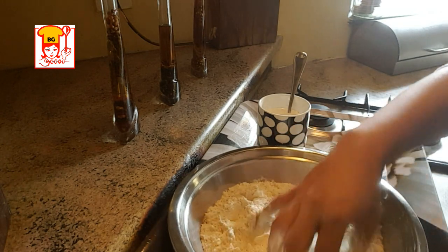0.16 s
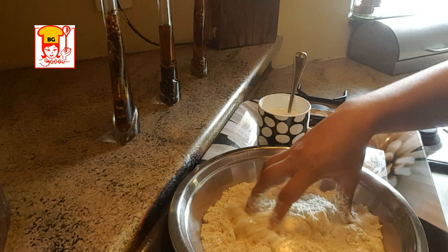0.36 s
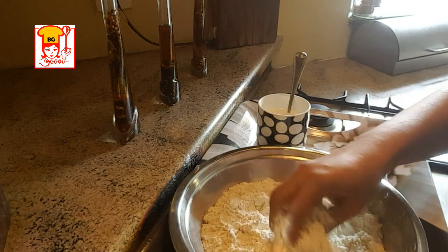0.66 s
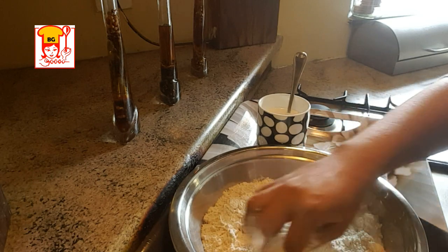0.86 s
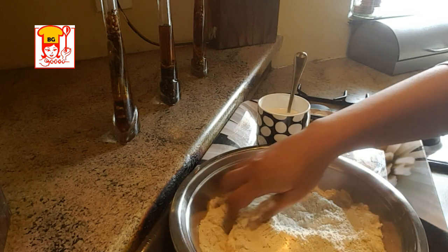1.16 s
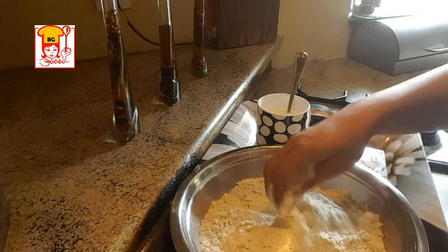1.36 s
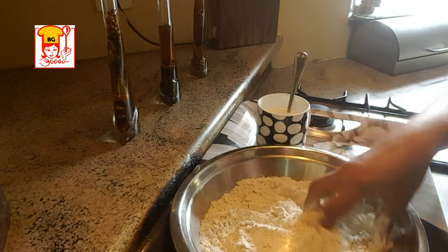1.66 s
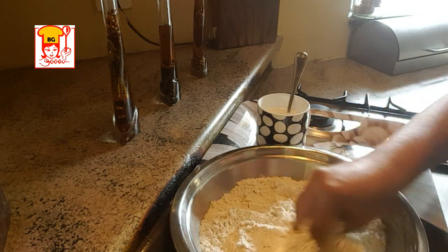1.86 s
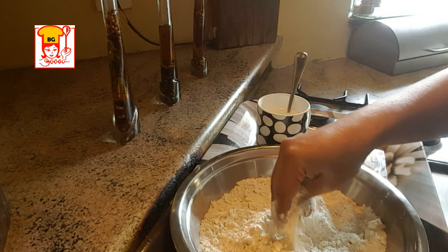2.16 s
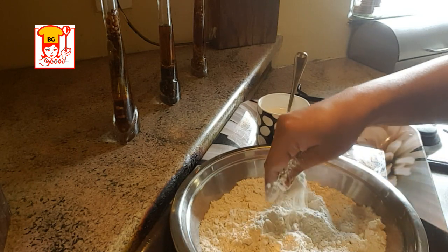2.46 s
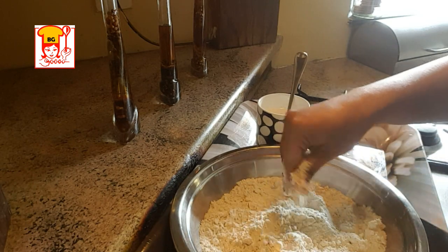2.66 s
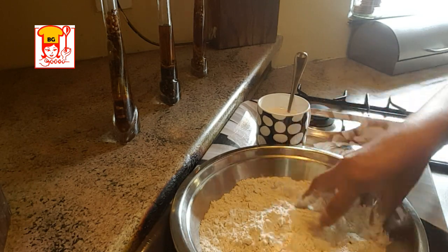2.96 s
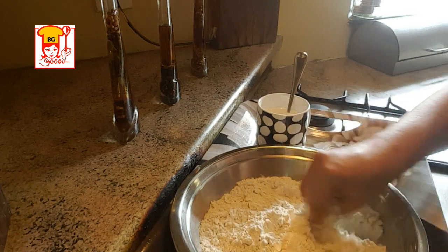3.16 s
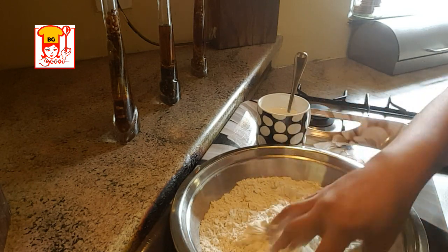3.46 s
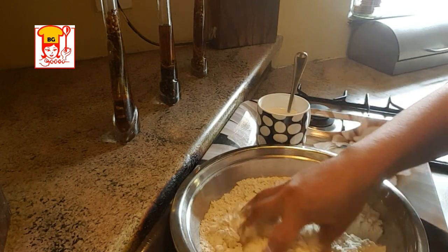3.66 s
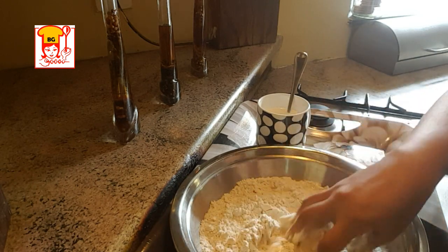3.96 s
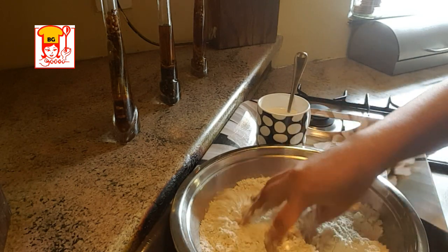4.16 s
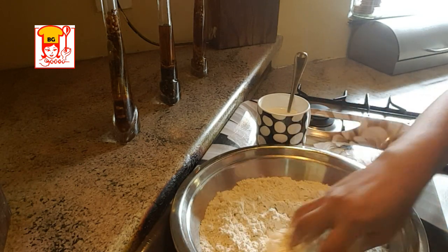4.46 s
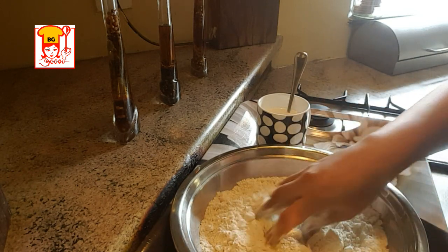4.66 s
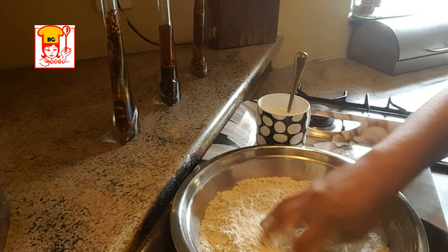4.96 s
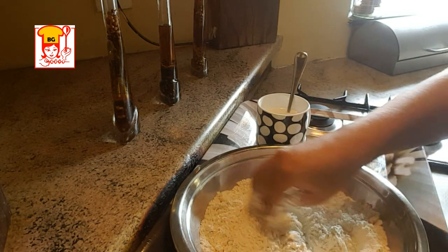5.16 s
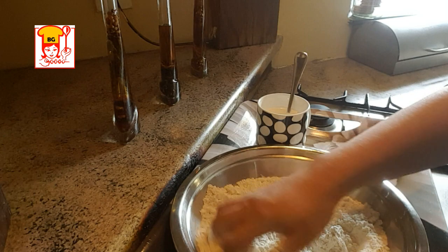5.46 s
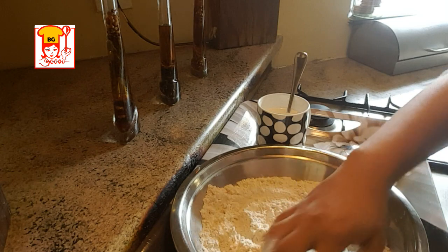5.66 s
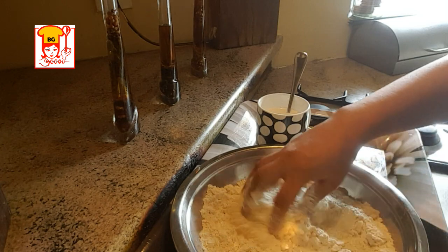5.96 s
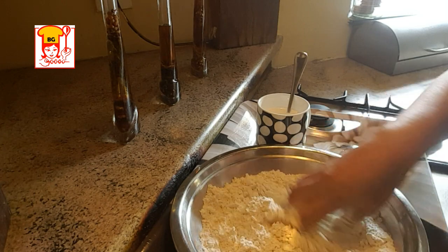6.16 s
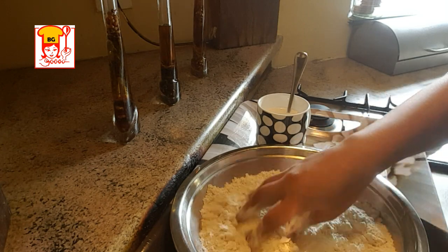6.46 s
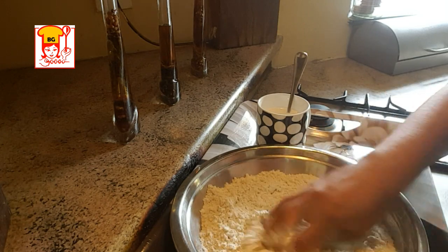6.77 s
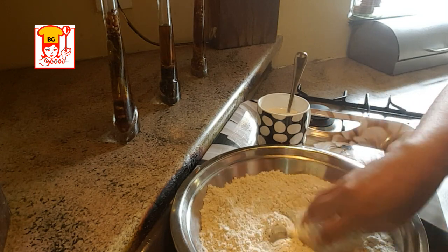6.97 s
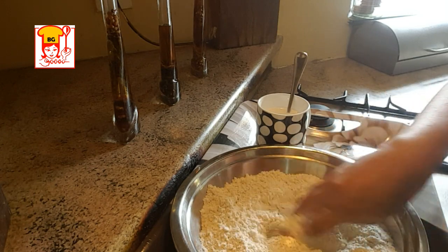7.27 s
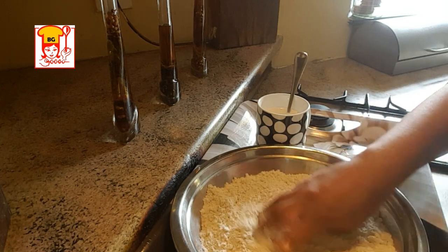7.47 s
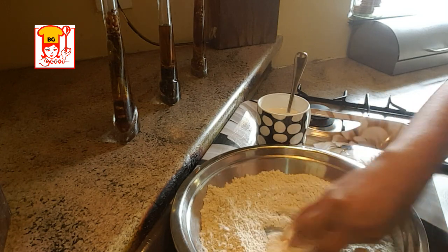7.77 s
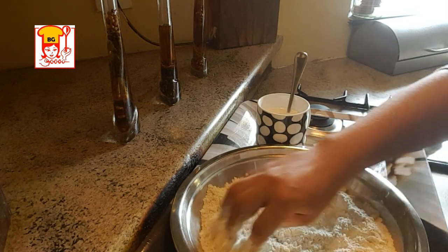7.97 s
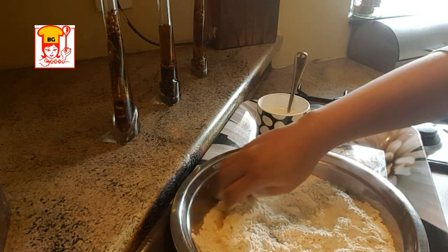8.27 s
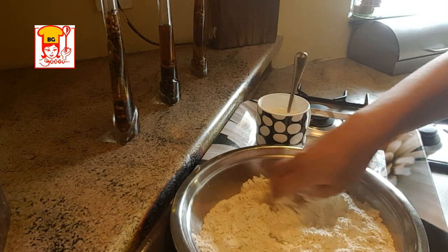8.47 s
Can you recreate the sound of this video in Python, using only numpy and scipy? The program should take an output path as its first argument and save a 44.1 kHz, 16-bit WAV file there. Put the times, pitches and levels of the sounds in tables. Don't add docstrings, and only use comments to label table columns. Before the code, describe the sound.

A hand works dry flour and fat in a steel bowl on a kitchen counter, heard close. Short scratchy strokes hiss and crunch, with a hard bright knock and nail scrapes in the first second and a half. A long quieter stretch follows with faint sifting, then busier steady rubbing, metallic scrapes and low counter bumps to the end. Faint appliance hum sits behind, slightly stronger rasp on the right.

```python
import sys
import numpy as np
from scipy import signal
from scipy.fft import rfft, irfft, next_fast_len
from scipy.io import wavfile
from scipy.ndimage import uniform_filter1d

SR = 44100
rng = np.random.default_rng(int(sys.argv[2]) if len(sys.argv) > 2 else 0)


def to_wav(s):
    ch = np.atleast_2d(s).T
    pcm = np.round(np.clip(ch, -1, 1) * 32767)
    wavfile.write(sys.argv[1], SR, pcm.astype(np.int16))


def volts_from_db(level):
    exponent = np.asarray(level, float) / 20
    return 10 ** exponent


N = 379701


def shape(x, points, to_gain):
    size = next_fast_len(N)
    hz, value = np.transpose(points)
    log_hz = np.log(np.arange(size // 2 + 1) * SR / size + 1)
    gain = to_gain(np.interp(log_hz, np.log(hz), value))
    return irfft(rfft(x, size) * gain, size)[..., :N]


def unit(x):
    return x / np.sqrt(np.mean(x ** 2))


def band(x, low_hz, high_hz):
    return signal.sosfilt(signal.butter(2, [low_hz, high_hz], "band", fs=SR, output="sos"), x)


def walk(rate):
    hold = int(SR / rate)
    steps = np.repeat(rng.standard_normal(N // hold + 1), hold)
    return 1.3 * uniform_filter1d(uniform_filter1d(steps, hold), hold)[:N]


def slips(rate, fade_s):
    kicks = (rng.random(N) < rate / SR) * rng.random(N)
    trail = signal.lfilter([1], [1, -np.exp(-1 / (fade_s * SR))], kicks)
    return unit(trail - trail.mean())


def grains(rate, spread_db):
    when, size, sign = rng.random(N), rng.exponential(size=N), rng.standard_normal(N)
    return unit((when < rate / SR) * sign * volts_from_db(spread_db * np.minimum(size, 4.5)))


# pitch_hz, likeness (0-1)
PORT_LIKENESS = [(60, 1), (250, 0.62), (1000, 0.16), (4000, 0), (12000, 0)]


def wide(mid, side):
    mid = shape(mid, PORT_LIKENESS, lambda c: np.sqrt(1 + np.clip(c, 0, 1)))
    side = shape(side, PORT_LIKENESS, lambda c: np.sqrt(1 - np.clip(c, 0, 1)))
    return np.array([mid + side, mid - side]) / np.sqrt(2)


def rasp(colour, rate, spread_db):
    return unit(shape(wide(grains(rate, spread_db), grains(rate, spread_db)), colour, volts_from_db))


def ring(force, modes, wander_db, spread):
    out, total = np.zeros((2, N)), 0
    for hz, width, db in modes:
        radius = np.exp(-np.pi * width / SR)
        pole = radius * np.exp(2j * np.pi * hz / SR)
        mode = signal.lfilter([1], [1, -pole], force * volts_from_db(wander_db * walk(14)))
        lean = np.clip(spread * min(hz / 900, 1) * rng.uniform(-1.61, 1), -.95, .95)
        turn = np.exp(1j * lean * np.array([[1], [-1]]))
        even_power = np.sqrt(2 * width * (1 - radius ** 2))
        out += volts_from_db(db) * even_power * (mode * turn).imag
        total += volts_from_db(2 * db) * width
    return out / np.sqrt(total)


SETTLE_DB, SETTLE_T60_S = -18.5, 0.47


def gesture(rows, attack_s, t60_s, rest_db):
    power = np.full(N, volts_from_db(2 * rest_db))
    for (start, length, db, swell_db), attack in zip(rows, attack_s):
        t = np.arange(int(start * SR), min(int((start + length + 1) * SR), N)) / SR - start
        hold_db = db + swell_db * np.clip(t / length, 0, 1) - max(swell_db, 0)
        after_db = -60 * np.maximum(t - length, 0)
        fall = volts_from_db(after_db / t60_s) + volts_from_db(SETTLE_DB + after_db / SETTLE_T60_S)
        level = volts_from_db(hold_db) * fall * np.minimum(t / attack, 1)
        power[int(start * SR):][:len(t)] += level ** 2
    return 10 * np.log10(power)


# pitch_hz, level_db (per Hz)
RUMBLE_COLOUR = [(15, -35.5), (25, -11), (54, 0.5), (70, -14), (102, -1.5), (124, -21.5), (157, -2.5),
                 (193, -28.5), (227, -7), (340, -21.5), (440, -52), (750, -120)]
# pitch_hz, level_db (per Hz)
AIR_COLOUR = [(200, -35), (340, -7.5), (426, -9.5), (702, -6.5), (969, -14), (1820, -19), (2130, -15.5),
              (5350, -26), (16000, -26)]
RUMBLE_DB, AIR_DB = -64, -70


def kitchen():
    rumble, air = (wide(rng.standard_normal(N), rng.standard_normal(N)) for _ in range(2))
    rumble = unit(shape(rumble, RUMBLE_COLOUR, volts_from_db)) * volts_from_db(RUMBLE_DB + 2.0 * walk(4.14))
    return rumble + unit(shape(air, AIR_COLOUR, volts_from_db)) * volts_from_db(AIR_DB + 0.9 * walk(3.2))


# start_s, length_s, hiss_db, steel_pressure_db, swell_db
FINGER_STIRS = [(0.0, 0.13, -56.5, 9.5, 12), (0.132, 0.077, -59, 4, -4.5), (0.58, 0.15, -80, 25, -10.5),
                (1.13, 0.041, -52, -1, -2), (1.17, .035, -60, 4, 3), (1.61, .05, -64, -3, 5),
                (1.831, 0.07, -68.5, 3.5, 6), (2.235, 0.033, -73.5, -11, 0), (2.608, 0.15, -74, -13, 0),
                (3.363, 0.055, -73.5, -7, 2), (3.58, 0.12, -76.5, -12, -1), (3.673, 0.2, -67, 5, 1),
                (4.066, .055, -72, 5, 1), (4.145, 0.027, -66.5, -6, -2.5), (4.242, 0.091, -59.5, 1.5, 18),
                (4.366, 0.032, -61.5, 1.5, 0.5), (4.589, 0.041, -65, 2, -0.5), (4.638, 0.12, -76, 8.5, 0.5),
                (4.726, 0.081, -61, -1.5, 3), (4.847, 0.072, -61.5, 4.5, 2), (5.416, .2, -69, 3.5, 4),
                (5.622, 0.077, -61.5, 3.5, 3), (0.512, 0.029, -50.5, 6, 0), (0.853, 0.026, -67.5, 21, 2),
                (4.462, .035, -60, 10, 4)]
# start_s, length_s, hiss_db, steel_pressure_db, swell_db
NAIL_SCRAPES = [(0.446, 0.017, -52, 21, -9), (0.484, 0.064, -76.5, 33, -11), (0.096, 0.027, -55, 11, -2.5),
                (0.741, 0.027, -82, 28, -7), (0.788, .035, -78.5, 29, -9.5), (5.324, .01, -70, 8, -7),
                (1.083, .04, -65.5, 8, 6), (1.125, 0.026, -64, 9.5, -8), (1.202, 0.105, -49.5, 11, -2),
                (3.009, 0.065, -68, -3, -4), (3.085, 0.064, -59.5, 10, 0), (6.345, 0.022, -66, 23.5, -3),
                (5.01, 0.073, -71.5, 10, -1), (5.079, 0.029, -61, 12, -7), (5.71, 0.094, -60, 5, -2.5),
                (6.168, 0.027, -48, 4, 4), (6.194, 0.077, -49.5, 8, -5), (6.288, .1, -65.5, 16, -2.5),
                (6.808, 0.05, -70.5, 13.5, -1.5), (6.856, 0.12, -56.5, 2, 1), (7.74, 0.048, -57, -2, -0.5),
                (1.655, .02, -62, 4, -3), (0.698, .012, -78, 18, -5), (0.646, .015, -76, 18, -5),
                (4.898, .02, -66, 8, -4), (4.86, .02, -69, 5, -3), (8.152, 0.046, -61, 5, -7),
                (8.376, 0.19, -48.5, 9, -5)]
# start_s, length_s, hiss_db, steel_pressure_db, swell_db
HAND_RUBS = [(6.435, 0.21, -57, 5, 4), (6.653, 0.15, -63.5, -3.5, 0.5), (7.036, 0.086, -54.5, -2, -3.5),
             (7.175, 0.15, -53, -1.5, 3), (7.376, 0.086, -55, 0.5, -5), (7.481, 0.18, -52.5, -3, 0),
             (7.678, 0.056, -57.5, -17, -3), (7.845, 0.086, -54, 2.5, -1), (7.8, 0.043, -55.5, 2, -3),
             (6.13, .045, -70, 3, 8), (1.33, .06, -75, 15, -6), (1.645, .095, -59, 5, 1),
             (8.191, .18, -54.5, -2, 9), (8.2, .17, -76, 21, 2), (5.085, 0.14, -58.5, 4.5, -5),
             (7.94, 0.048, -66, -5, -8), (6.97, 0.058, -58, -14, -2), (5.77, .125, -54, 7, 1),
             (1.59, .04, -68, -5, 0)]
# hiss_db, crunch_db, drag_db, sway_db, slab_db, foot_db
STILL_DB = (-95, -86.5, -77.5, -74, -66.5, -73)
SCRAPE_ATTACK_S, STIR_ATTACK_S, RUB_ATTACK_S = 0.0041, 0.027, 0.035
FLOUR_T60_S, STEEL_T60_S = 0.11, 0.092
CRUNCH_DB, CRUNCH_PER_PRESSURE = -2.5, 0.43


def hand():
    strokes = [*NAIL_SCRAPES, *FINGER_STIRS, *HAND_RUBS]
    start, length, hiss_db, pressure_db, swell_db = np.transpose(strokes)
    counts = [len(NAIL_SCRAPES), len(FINGER_STIRS), len(HAND_RUBS)]
    attack_s = np.repeat([SCRAPE_ATTACK_S, STIR_ATTACK_S, RUB_ATTACK_S], counts)

    def layer(gain_db, t60_s, rest_db):
        rows = np.transpose([start, length, hiss_db + gain_db, swell_db])
        return gesture(rows, attack_s, t60_s, rest_db)

    hiss = layer(0, FLOUR_T60_S, STILL_DB[0])
    crunch = layer(CRUNCH_DB + CRUNCH_PER_PRESSURE * pressure_db, FLOUR_T60_S, STILL_DB[1])
    return hiss, crunch, layer(pressure_db, STEEL_T60_S, STILL_DB[2])


# pitch_hz, level_db (per Hz)
DUST_COLOUR = [(2500, -16), (5000, -3), (6200, -2), (9000, -1), (13100, -3), (14000, -9), (16000, -15)]
# pitch_hz, level_db (per Hz)
CRUMB_COLOUR = [(1200, -9.5), (2200, -0.5), (3000, 0), (5200, -1), (6200, -30), (12000, -43)]
# pitch_hz, width_hz, level_db
RIM_MODES = [(2350, 100, -3), (2632, 33, 1), (3030, 68, -2.5), (3435, 60, 1), (3850, 120, 0.5),
             (4260, 195, -1.5), (4650, 150, 3), (5026, 37, -2.5), (5360, 110, -10.5), (5970, 170, -10.5)]


def flour(hiss_db, crunch_db):
    grip_db = 1.48 * slips(40, 0.015)
    hiss = rasp(DUST_COLOUR, 15000, .8) * volts_from_db(hiss_db + 0.42 + 0.96 * grip_db + 1.7 * walk(60))
    crunch = volts_from_db(crunch_db + grip_db + 2.26 * slips(60, 0.01))
    wall = ring(grains(6000, 1.9) * crunch, RIM_MODES, wander_db=2.5, spread=1.0)
    return hiss + volts_from_db(-2.5) * rasp(CRUMB_COLOUR, 6000, 2.1) * crunch + volts_from_db(-1.5) * wall


def glints(hiss_db):
    modes = [(hz, 0.031 * hz, 0) for hz in np.geomspace(5800, 12500, num=12)]
    return ring(grains(9000, 1.4) * volts_from_db(hiss_db - 8.0), modes, wander_db=5.0, spread=1.06)


# start_s, length_s, sway_db, slab_db, foot_db
BOWL_ROCKS = [(0.08, 0.21, -57.5, -62, -58.5), (0.445, 0.07, -47, -43, -42), (0.6, 0.085, -63, -56, -55),
              (0.74, 0.17, -63, -55, -58), (1.1, 0.11, -68, -50.5, -49), (1.2, 0.15, -61, -54.5, -53.5),
              (1.68, .08, -61, -56, -63), (3.015, 0.035, -66, -54, -68), (3.09, 0.071, -55, -55, -57.5),
              (4.17, 0.26, -65, -62, -69), (4.465, 0.042, -66, -56, -50.5), (4.74, 0.16, -62, -77, -75),
              (5.0, 0.13, -47.5, -52.5, -55.5), (5.75, .16, -60, -71, -53.5), (6.17, 0.18, -57, -58.5, -48),
              (6.8, 0.068, -43, -48, -52), (7.16, 0.08, -42.5, -51, -62), (7.5, .12, -58, -63, -66),
              (7.86, 0.13, -48, -53.5, -63), (8.157, 0.03, -55, -49, -46.5), (8.27, .08, -60, -47.5, -51.5),
              (8.38, 0.14, -55, -48.5, -47.5), (5.35, 0.44, -64, -76, -72), (6.45, .3, -61, -66, -78)]
ROCK_ATTACK_S, ROCK_T60_S, ROCK_SAG_DB = 0.016, 0.31, -4


def rocking():
    start, length, *loads_db = np.transpose(BOWL_ROCKS)
    sag_db = np.full(len(start), ROCK_SAG_DB)
    attack_s = [ROCK_ATTACK_S] * len(start)
    return [gesture(np.transpose([start, length, db, sag_db]), attack_s, ROCK_T60_S, rest_db)
            for db, rest_db in zip(loads_db, STILL_DB[3:])]


def wobble(hz, drift):
    return np.sqrt(2) * np.sin(2 * np.pi * np.cumsum(hz * (1 + drift * walk(6.5))) / SR)


# pitch_hz, width_hz, level_db
SLAB_MODES = [(85, 9, -6), (116.4, 21, 0), (157.6, 20, -5)]
# pitch_hz, width_hz, level_db
FOOT_MODES = [(257.5, 28, 7.5), (295.8, 25, 5.5), (298, 24, -7)]
SWAY_HZ, SLAB_HZ = 47.6, 99.6


def counter():
    sway_db, slab_db, foot_db = rocking()
    sway = wobble(SWAY_HZ, 0.0389) * volts_from_db(sway_db + 0.7 + 1.4 * walk(8.6))
    slab_ring = ring(grains(2000, .5), SLAB_MODES, wander_db=1.0, spread=1.2)
    slab = volts_from_db(-2.5) * wobble(SLAB_HZ, 0.039) + volts_from_db(-3.5) * slab_ring
    foot = band(ring(grains(2000, 2.1), FOOT_MODES, wander_db=2.5, spread=1.0), 215, 345)
    return sway + slab * volts_from_db(slab_db - 1.1) + foot * volts_from_db(foot_db - 2.0)


# pitch_hz, width_hz, level_db
BOWL_MODES = [(492.4, 11.7, -5), (608, 26, -6.5), (658, 58, -10), (696.5, 19, 2.5), (785, 36, -1),
              (876, 33, -4), (988, 39, -3), (1115, 74, -6), (1287, 33, 0), (1430, 95, -3.5),
              (1442, 46, -9.5), (1772, 55, -4), (2077, 26, -22)]
# pitch_hz, level_db (per Hz)
SKIN_COLOUR = [(200, -32), (350, -11.5), (650, -1), (1000, -9.5), (1450, -1.5), (2200, -10), (3500, -15),
               (8000, -77)]


def drag(drag_db):
    push = volts_from_db(drag_db + 1.8 * slips(60, 0.013))
    wall = ring(grains(5000, 1.7) * push, BOWL_MODES, wander_db=1.5, spread=1.35)
    return volts_from_db(-2.5) * wall + volts_from_db(-4.0) * rasp(SKIN_COLOUR, 4000, 1.2) * push


# start_s, length_s, pitch_hz, peak_db
SKIN_CATCHES = [(.097, .016, 1421, -46), (.109, .008, 1421, -46), (.121, .02, 1421, -45),
                (.19, .006, 390, -46), (.458, .024, 1291, -37), (.504, .02, 1636, -48),
                (.524, .024, 1291, -45), (.594, .02, 1680, -50), (.585, .085, 700, -53),
                (.7, .015, 1650, -58), (.747, .014, 1300, -53), (.795, .012, 1800, -54),
                (.868, .018, 689, -41), (.873, .013, 473, -40), (.868, .018, 1808, -49),
                (1.206, .012, 1335, -38), (1.21, .009, 602, -36), (1.225, .01, 645, -36),
                (1.231, .028, 1335, -35), (1.248, .006, 818, -39), (1.26, .026, 1480, -40),
                (1.271, .006, 645, -41), (1.295, .014, 1507, -42), (1.3, .015, 904, -38),
                (1.698, .009, 602, -51), (4.495, .008, 600, -48), (4.9, .015, 690, -55),
                (4.9, .015, 1500, -56), (5.828, .012, 400, -48), (5.849, .008, 602, -46),
                (5.888, .018, 602, -45), (5.885, .02, 1851, -49), (6.24, .013, 689, -38),
                (6.243, .006, 1335, -43), (6.345, .02, 645, -46), (6.345, .02, 1650, -49),
                (6.393, .008, 689, -49), (6.63, .012, 608, -50), (6.9, .04, 1300, -56),
                (6.955, .01, 1450, -53), (7.62, .03, 1800, -57), (7.745, .03, 1780, -59),
                (8.261, .012, 689, -51), (8.317, .008, 689, -49), (8.33, .012, 689, -50),
                (8.372, .01, 600, -45), (8.436, .014, 645, -40), (8.512, .03, 645, -45),
                (8.558, .024, 645, -45), (8.562, .014, 1894, -46)]
# start_s, length_s, pitch_hz, peak_db
RIM_FLECKS = [(.107, .01, 2713, -46), (.446, .006, 2067, -40), (.447, .011, 4608, -48),
              (.447, .008, 4220, -48), (.456, .011, 2713, -41), (.454, .012, 3488, -42),
              (.524, .022, 2411, -50), (.65, .015, 2200, -58), (.742, .012, 2300, -58),
              (.868, .018, 2630, -55), (.872, .016, 3300, -57), (1.155, .01, 4650, -54),
              (1.18, .007, 2799, -48), (1.203, .006, 4651, -48), (1.203, .008, 3617, -51),
              (1.219, .008, 3273, -45), (1.221, .012, 4694, -50), (1.261, .011, 3273, -49),
              (1.264, .018, 4651, -49), (1.28, .006, 2325, -45), (1.3, .01, 2325, -45),
              (3.118, .03, 3400, -58), (5.085, .01, 2400, -55), (5.085, .01, 3000, -56),
              (5.801, .008, 4521, -51), (6.181, .04, 3850, -50), (6.184, .024, 4952, -51),
              (6.198, .011, 4694, -48), (6.201, .024, 3445, -47), (6.262, .012, 2627, -51),
              (6.856, .008, 2270, -54), (7.066, .01, 5890, -52), (7.315, .008, 2600, -54),
              (7.53, .012, 4800, -55), (7.61, .012, 4700, -55), (7.872, .008, 5400, -55),
              (8.213, .01, 4650, -51), (8.226, .012, 4700, -51), (8.226, .012, 5500, -54),
              (8.388, .015, 3746, -47), (8.396, .011, 4651, -47), (8.407, .018, 3014, -44),
              (8.467, .01, 4651, -47), (8.493, .012, 4521, -51), (8.5, .015, 4220, -51),
              (8.536, .011, 2627, -50), (8.554, .008, 2627, -49)]
CATCH_RISE, CATCH_FADE = .2, .3
CATCH_CHATTER, CATCH_LEAD_S = .5, .002


def catches():
    rows, t = [*SKIN_CATCHES, *RIM_FLECKS], np.arange(SR // 8) / SR
    out, steps = np.zeros((2, N + len(t))), rng.uniform(-1, 1, (len(rows), 2))
    chatter = uniform_filter1d(rng.standard_normal((len(rows), 2, len(t))), size=100) * 10
    for (s, length, hz, db), (turn, lag), (push, drift) in zip(rows, steps, chatter):
        rise = np.minimum(t / (CATCH_RISE * length), 1)
        swell = rise * np.exp(-np.maximum(t - .7 * length, 0) / (CATCH_FADE * length))
        port_lag = .9 * lag * np.array([[1], [-1]])
        phase = 2 * np.pi * hz * t + np.pi * turn + CATCH_CHATTER * drift + port_lag
        flutter = 1 + .5 * CATCH_CHATTER * push
        at = int((s - CATCH_LEAD_S) * SR)
        out[:, at:at + len(t)] += volts_from_db(db + .3) * swell * flutter * np.sin(phase)
    return out[:, :N]


# start_s, peak_db, pitch_hz, treble_db
BOWL_KNOCKS = [(0.183, -43, 500, -20), (0.445, -17.5, 1600, -11), (0.456, -26, 1700, -6),
               (0.482, -19, 705, -30), (0.584, -44, 1673, -19), (0.649, -48, 1600, -14),
               (0.74, -44, 510, -19), (0.793, -42, 684, -27), (0.872, -35.5, 600, -24),
               (1.09, -46, 690, -8), (1.13, -26, 603, -18), (1.147, -28.5, 616, -15),
               (1.21, -33, 1300, -14), (3.021, -49, 1390, -10), (3.088, -53, 470, -12),
               (4.168, -54, 637, -22), (4.483, -35, 590, -17), (5.016, -40, 477, -32),
               (5.084, -37.5, 993, -18), (5.713, -45.5, 710, -14), (6.175, -44, 2670, -11),
               (6.291, -32.5, 545, -24), (6.452, -46, 660, -11), (6.815, -36.5, 615, -17),
               (7.746, -53, 1330, -4), (7.813, -51, 700, -8), (8.157, -26.5, 650, -14),
               (8.165, -31, 480, -19), (8.384, -27, 647, -23), (8.403, -27, 564, -20)]
KNOCK_T60_S = 0.023


def knocks():
    t = np.arange(SR // 8) / SR
    note, tick, spit = np.zeros((2, N + len(t))), np.zeros(N + len(t)), np.zeros((2, N + len(t)))
    rattle = rng.standard_normal((len(BOWL_KNOCKS), 2, len(t)))
    fade = np.exp(-np.log(1000) * t / KNOCK_T60_S) * np.minimum(t / 0.0014, 1)
    for (s, db, hz, treble_db), noise in zip(BOWL_KNOCKS, rattle):
        at = slice(int(s * SR), int(s * SR) + len(t))
        lag = np.array([[.6], [-.6]]) * min(hz / 700, 1)
        note[:, at] += volts_from_db(db + 0.5) * fade * np.sin(2 * np.pi * hz * t + lag)
        tick[at] += volts_from_db(db - 13.0) * noise[0] * np.exp(-t / 0.0048)
        spit[:, at] += volts_from_db(db + treble_db - 4.0) * noise * np.exp(-t / 0.006)
    spit = band(spit, 1500, 5500)
    return ring(tick[:N], BOWL_MODES, wander_db=4.0, spread=1.6) + (note + spit)[:, :N]


# start_s, length_s, pitch_hz, level_db
FINGERTIP_SINGS = [(0.856, 0.045, 600, -42), (5.79, 0.09, 4600, -58), (7.55, .075, 1300, -58),
                   (8.156, .025, 1700, -44), (6.375, .025, 1400, -46), (1.2, 0.088, 865, -54),
                   (5.72, 0.19, 4650, -67), (6.168, 0.085, 2630, -43), (6.178, 0.072, 3030, -44.5),
                   (6.222, 0.056, 755, -37), (8.17, 0.16, 4650, -55), (8.517, .06, 1850, -49),
                   (4.476, .03, 1766, -46.5), (0.579, 0.027, 1680, -48)]


def sings():
    out, chatter = np.zeros((2, N)), grains(1500, 1.1)
    for s, length, hz, db in FINGERTIP_SINGS:
        swell = np.interp(np.arange(N) / SR, [s, s + 0.26 * length, s + length], [0, 1, 0])
        mode = [(hz, 0.035 * hz + 15, 0)]
        out += ring(chatter * swell * volts_from_db(db), mode, wander_db=2.0, spread=1.22)
    return out


# start_s, pitch_hz, peak_db
FOOT_THUDS = [
    (1.735, 101.4, -42.5),
    (3.025, 96, -39.5),
]
THUD_ATTACK_S, THUD_T60_S = 0.013, 0.12


def thuds():
    out = np.zeros(N)
    for s, hz, db in FOOT_THUDS:
        t = np.maximum(np.arange(N) / SR - s, 0)
        swell = volts_from_db(db - 60 * t / THUD_T60_S) * (1 - np.exp(-t / THUD_ATTACK_S))
        out += 4 * swell * np.sin(2 * np.pi * hz * t)
    return out


ROOM_T60_S, ROOM_DB = 0.22, -15


def room(x):
    t = np.arange(SR // 2) / SR
    tail = rng.standard_normal((2, len(t))) * np.exp(-np.log(1000) * t / ROOM_T60_S) * (t > .003)
    tail = unit(signal.lfilter([1], [1, -.6], tail)) / np.sqrt(len(t))
    return volts_from_db(ROOM_DB) * signal.fftconvolve(x.mean(axis=0, keepdims=True), tail, axes=1)[:, :N]


def scene():
    hiss_db, crunch_db, drag_db = hand()
    bowl = flour(hiss_db, crunch_db) + drag(drag_db) + catches() + knocks() + sings()
    around = kitchen() + glints(hiss_db) + counter() + thuds()
    return bowl + room(bowl) + around


def band_limit(x):
    return signal.sosfilt(signal.butter(12, 15800, fs=SR, output="sos"), x)


# pitch_hz, difference_db
PORT_TILT = [(60, -1), (110, -1.5), (200, -0.5), (380, -6.5), (700, -1), (1290, -0.5), (2380, -1.0),
             (4400, -2.5), (8120, -1.5), (15000, -7)]


def record(dry):
    left = shape(dry[0], PORT_TILT, lambda db: volts_from_db(db / 2))
    right = shape(dry[1], PORT_TILT, lambda db: volts_from_db(-db / 2))
    cut = signal.sosfilt(signal.butter(4, 36, "high", fs=SR, output="sos"), [left, right])
    return band_limit(cut - .0005)


dry = scene()
out = record(dry)
to_wav(out)
```